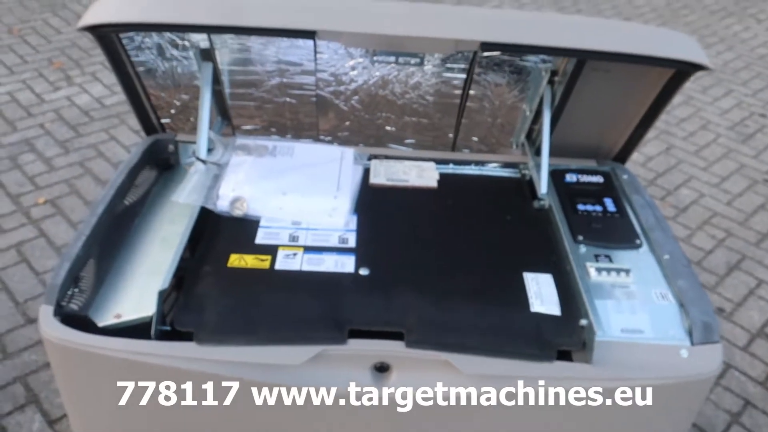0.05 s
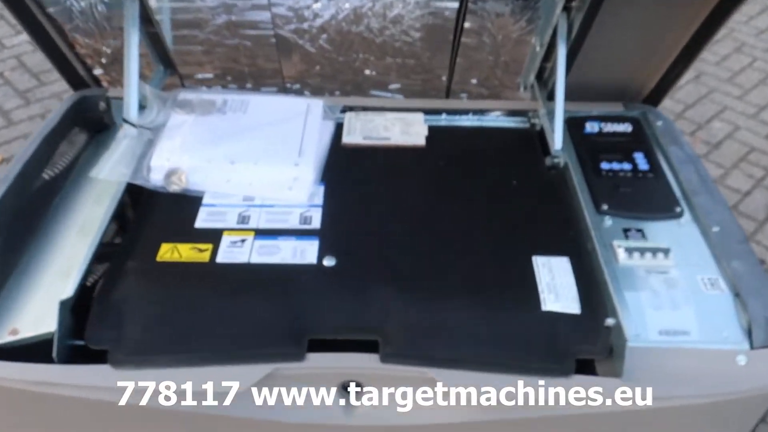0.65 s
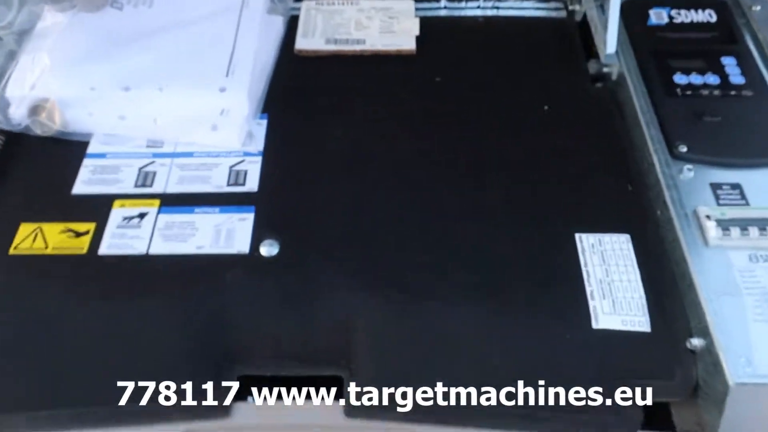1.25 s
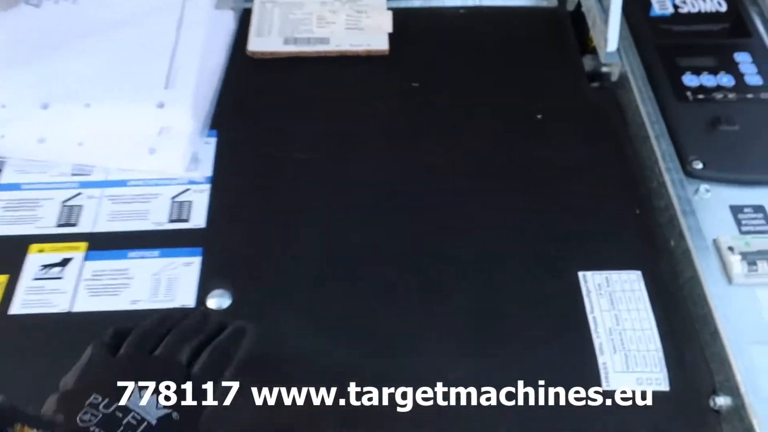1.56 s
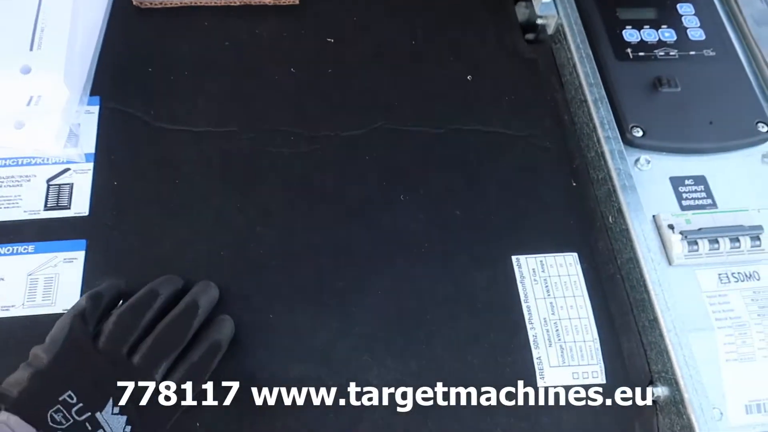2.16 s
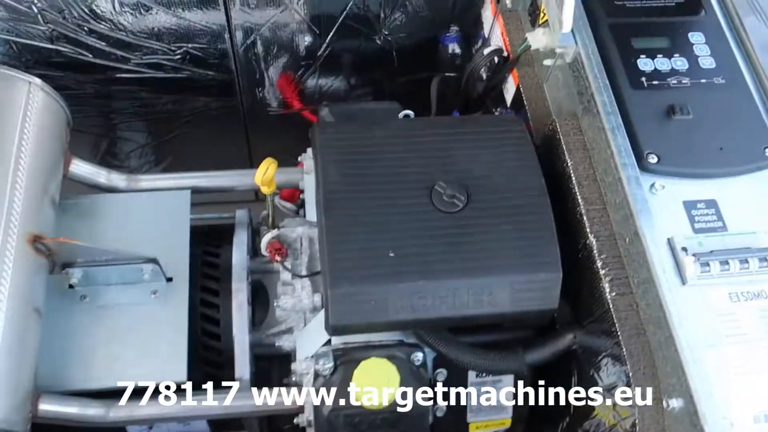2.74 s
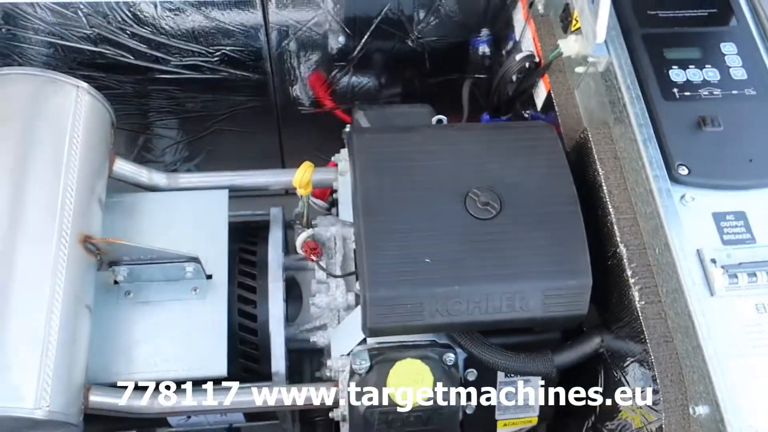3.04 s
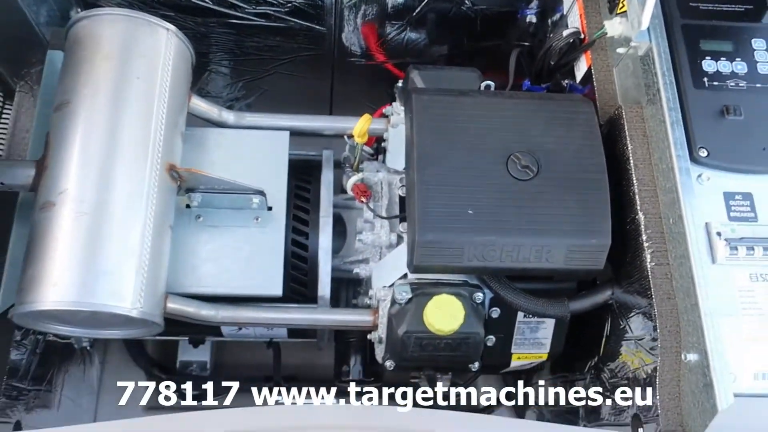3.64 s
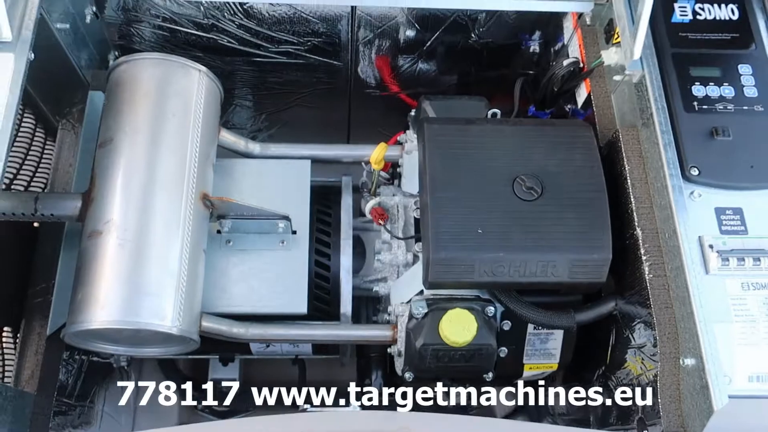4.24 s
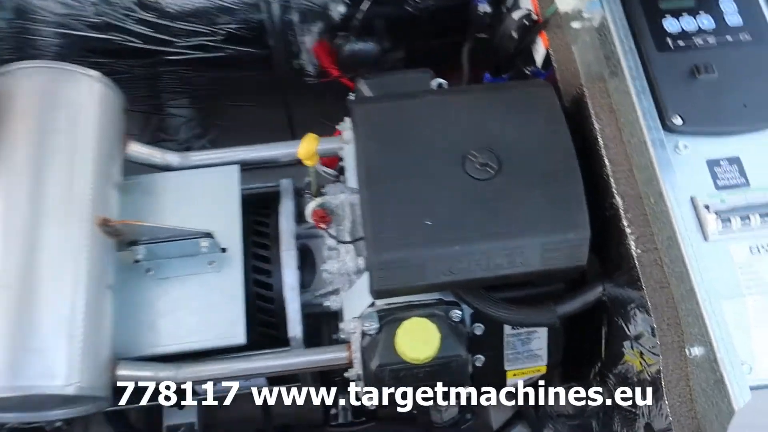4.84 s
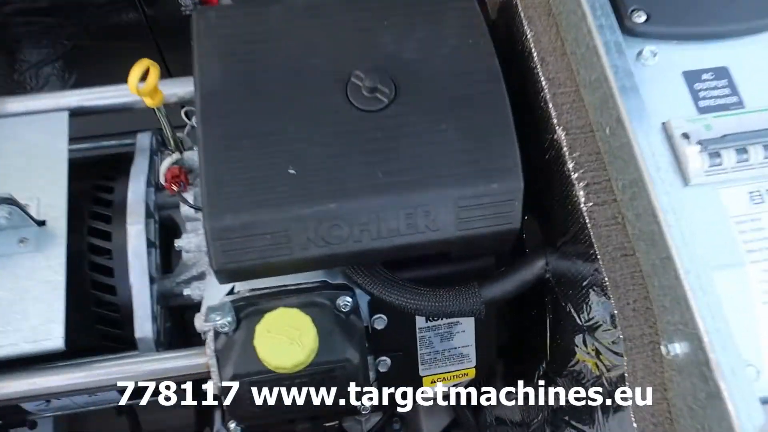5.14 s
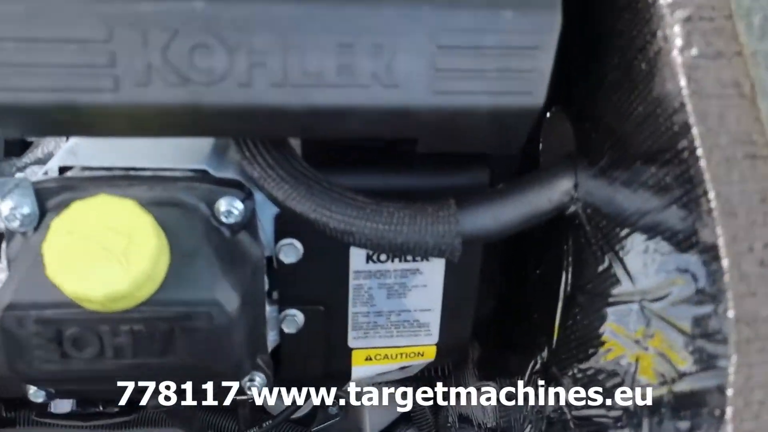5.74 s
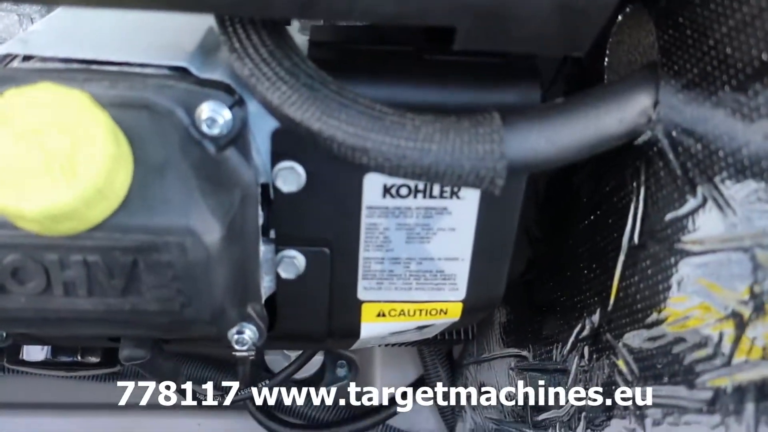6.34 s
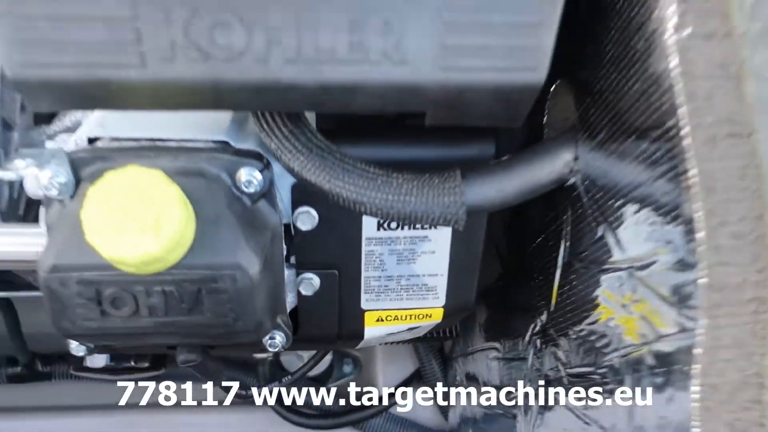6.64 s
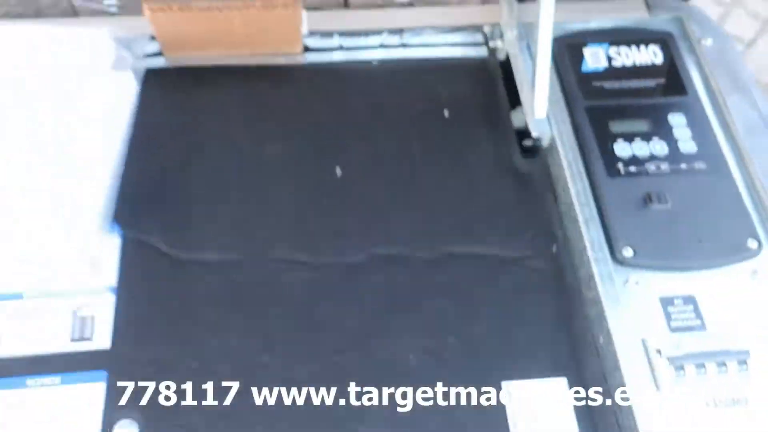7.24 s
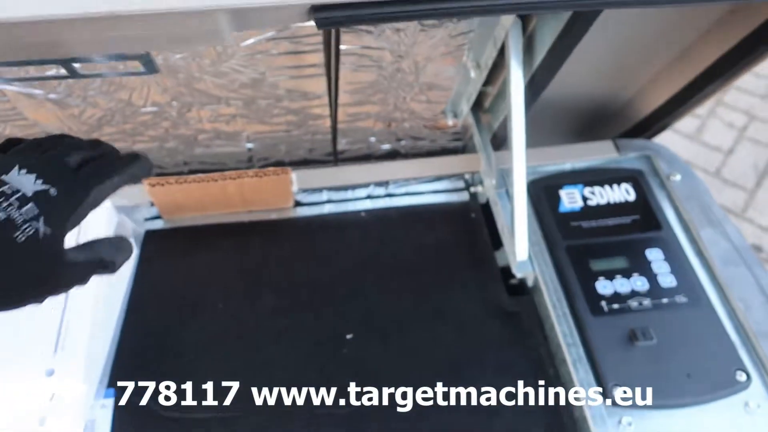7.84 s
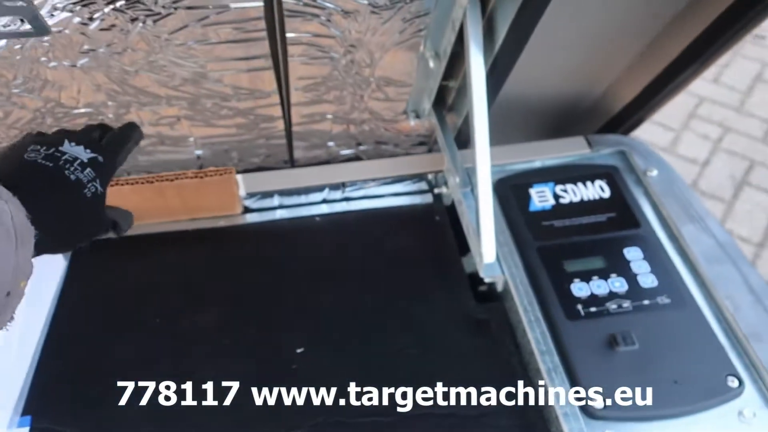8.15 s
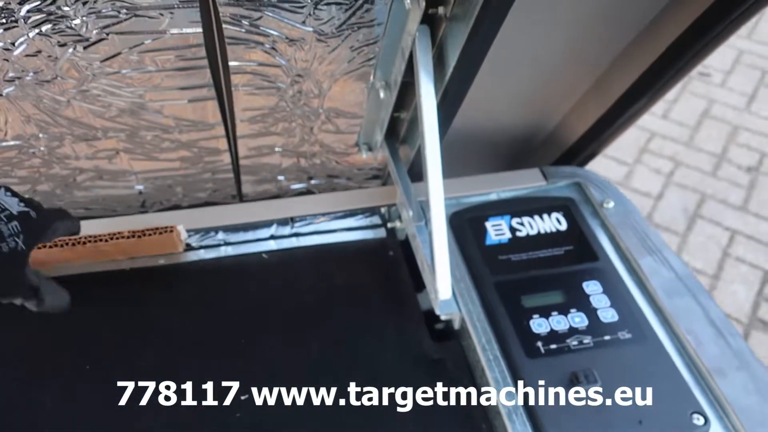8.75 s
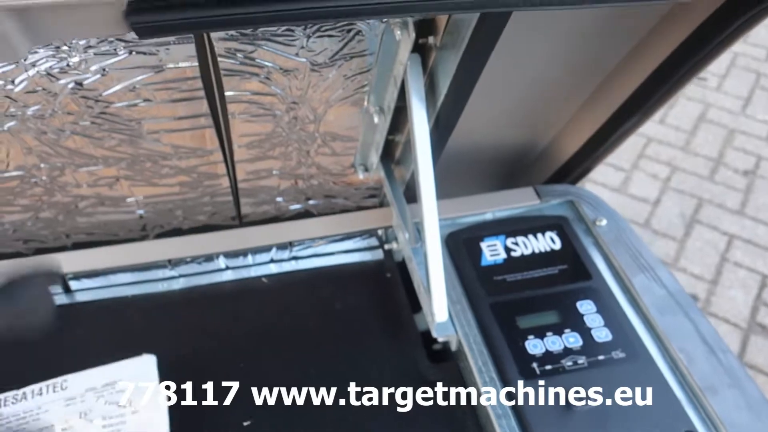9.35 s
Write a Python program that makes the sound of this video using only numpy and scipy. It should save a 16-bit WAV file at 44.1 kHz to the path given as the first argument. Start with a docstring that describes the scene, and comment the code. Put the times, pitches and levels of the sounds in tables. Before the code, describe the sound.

Traffic rumbles steadily around a paved yard while a distant diesel revs up and settles to idle. Close to the microphone, a gloved hand rubs and lifts a silent generator's inner cover with plastic clicks, knocks and a foam swish. The open bay rings faintly with the yard noise. Then the cover drops shut with a loud, rattling slam that overloads the microphone; everything dips and slowly recovers as papers are handled.

```python
"""Traffic rumbles round a paved yard while, some way off, a diesel's exhaust revs up and falls back to idle.
Close to the camera's stereo microphone a fine hiss swells and a gloved hand lifts the inner cover of a
switched-off generator: plastic clicks, the panel knocks, foam swishes, and the open bay rings with the
yard noise. The cover drops shut; the slam overloads the camera, whose gain control ducks everything and
slowly recovers while papers are handled on top."""
import sys
import numpy as np
from scipy import signal
from scipy.fft import rfft, irfft, next_fast_len
from scipy.io import wavfile
from scipy.ndimage import map_coordinates

SR = 44100
rng = np.random.default_rng(int(sys.argv[2]) if len(sys.argv) > 2 else 0)


def digitize_waveform(pressure):
    """Quantize a signal to 16-bit integers and store it at the path in sys.argv[1].

    Rows of a 2-D input are taken as channels; values are limited to [-1, 1].
    """
    field = np.atleast_2d(pressure).T
    bounded = np.clip(field, -1, 1)
    quanta = np.round(bounded * 32767).astype(np.int16)
    wavfile.write(sys.argv[1], SR, quanta)


N = 414099
TIME = np.arange(N) / SR

# traffic at the microphone: (time [s], rumble [dB], roar [dB], hiss [dB])
TRAFFIC_LEVELS = [(0.1, -34.5, -39, -46.5), (1.1, -32, -38, -42.5), (1.7, -32, -37, -45),
                  (3.3, -29, -38, -44.5), (3.9, -31.5, -37, -43), (4.7, -31, -39, -45.5),
                  (5.2, -33.5, -35.5, -42.5), (6.05, -32, -37.5, -46.5), (6.6, -34.5, -42, -49.5),
                  (9.3, -32, -39.5, -44.5)]
# its spectrum in the yard: (frequency [Hz], gain [dB])
TRAFFIC_COLOUR = [(18, -19), (30, -14), (58, -3), (90, -.5), (140, -5), (220, -4.5), (300, -6), (400, -11),
                  (700, -10.5), (1050, -15.5), (1250, -23), (2200, -31), (3400, -41.5), (4600, -48),
                  (8000, -60.5), (15000, -90)]
# width of diffuse sound at the two microphone ports: (frequency [Hz], side minus mid [dB])
STEREO_WIDTH = [(50, -68), (125, -34), (380, -14), (700, -17), (1300, -1), (2400, 1), (8000, 6.5)]
# the microphone turns in the noise: (time [s], left minus right [dB])
MIC_TURN = [(0.0, 3), (2.4, 3.5), (4.7, -2.5), (6.4, -3.5), (7.0, 0)]
# echo off the panel nearest the moving microphone: (time [s], lag [ms])
PANEL_ECHO = [(1.6, 0.62), (3.4, 0.19), (4.5, 0.44), (5.4, .59), (7.0, 0.51)]
# hollows under the lid and round the engine: (width [Hz], [(time [s], pitch [Hz], level [dB])])
HOLLOWS = [(45, [(3.1, 452, -49), (3.5, 443, -42), (4.0, 428, -40.5), (4.5, 428, -47), (5.2, 497, -44),
           (5.9, 481, -60)]), (20.4, [(3.2, 754, -64), (3.6, 745, -45.5), (4.0, 795, -49.5),
           (4.7, 760, -57), (5.3, 752, -51), (5.85, 748.7, -36.5), (6.2, 733, -55), (6.5, 760, -72)]),
           (85.5, [(3.1, 998, -70), (3.45, 980, -41), (3.7, 924, -41.5), (3.95, 1055, -39),
           (4.6, 1043, -48.5), (5.2, 1133, -46.5), (5.85, 1023, -38), (6.2, 1040, -49), (6.7, 1000, -76)]),
           (350, [(3.3, 2000, -66), (3.6, 1990, -52.5), (4.6, 2000, -49.5), (5.0, 1720, -55),
           (5.35, 1620, -41.5), (5.7, 1593, -54), (6.5, 1580, -54), (7.0, 1650, -77)]),
           (900, [(0, 3670, -60.5), (1.1, 3700, -53), (1.6, 3700, -64), (2.2, 3700, -82)]),
           (550, [(3.6, 2600, -75), (4.0, 2650, -57), (4.55, 2540, -48), (4.85, 2850, -52.5),
           (5.15, 3648, -53), (5.6, 3830, -67), (6.3, 3778, -80)])]
# distant diesel, revving and falling back: (time [s], firing rate [Hz])
DIESEL_FIRING = [(.55, 55.05), (1.1, 60.9), (1.45, 63.26), (2.38, 71.86), (2.65, 62.1), (2.95, 45.76),
                 (3.25, 40.05), (3.6, 46.4), (4.1, 48.76), (9.39, 52.4)]
# its exhaust note: (order [multiple of the firing rate], gain [dB])
EXHAUST_ORDERS = [(1, -3), (2, -6), (4, -10.5), (6, -20.5)]
# soft swells of fine hiss close to the microphone: (start [s], length [s], level [dB], swell [dB])
HISS_SWELLS = [(.75, 0.78, -63.5, 0), (5.0, 0.74, -67, -17), (6.85, 0.34, -62, 3), (7.17, 0.094, -41.5, 11),
               (8.64, 0.29, -61, 13), (8.968, 0.038, -36.5, 0)]
# spectrum of that hiss: (frequency [Hz], gain [dB])
HISS_COLOUR = [(800, -19), (2500, 8.5), (5000, 4.5), (9000, 5.5), (13000, -1), (15500, -3.5)]
# plastic and loose parts, close by: (time [s], peak level [dB], favoured frequency [Hz])
CLICKS = [(0.4303, -20, 4300), (1.56, -35, 4500), (1.796, -31, 4100), (1.802, -26.5, 8900),
          (1.917, -38, 4130), (2.0, -32, 2600), (2.3045, -17.5, 3000), (2.435, -27, 2370),
          (2.549, -22.5, 2190), (2.6291, -20.5, 2600), (5.029, -28.5, 11000), (5.691, -30.5, 8980),
          (6.9934, -30, 2787), (7.074, -23.5, 9020), (7.172, -25, 6940), (7.389, -13, 6100),
          (7.41, -20, 6000), (7.42, -17, 5000), (7.435, -18, 6000), (7.485, -32, 4970), (8.712, -42, 2490),
          (8.768, -33, 4070), (8.8935, -33, 4000), (9.006, -23, 2534), (9.0927, -24.5, 3520),
          (9.1368, -12, 3560)]
# modes of those parts: (frequency [Hz], width [Hz], gain [dB])
PLASTIC_MODES = [(950, 210, 0), (2500, 550, 0.5), (3120, 410, 5.5), (3360, 800, -0.5), (3970, 530, -1),
                 (6500, 640, -8.5), (8800, 1700, -14.5), (11900, 3400, -15.5)]
# knocks on the cover, with the slam near 7.35 s:
# (time [s], gain [dB], contact cut-off [Hz], favoured frequency [Hz], relative crack level [dB])
KNOCKS = [(1.794, -24.5, 700, 300, -3), (2.287, -15, 399.5, 148, -12), (2.302, -16, 680, 159, -5),
          (2.309, -16, 720, 635, -25), (2.333, -18, 190, 134, -28), (2.546, -22, 749.4, 770, -5),
          (2.554, -12, 600, 99.4, -11), (2.576, -15, 220, 117, -28), (2.629, -17, 407, 108, -21),
          (3.223, -17.5, 300, 138, -30), (5.027, -22, 1600, 494, -7), (7.171, -34.5, 450.7, 159.6, 5),
          (7.2392, -16, 560, 148, -10), (7.254, -17, 1000, 79, -8), (7.3453, 6.5, 693, 284, -9.5),
          (7.3497, 9, 780, 75.3, -9), (7.358, 3, 600, 122, -13), (7.389, 1.5, 900, 90, -14),
          (7.409, 1.5, 995, 111, -14.5), (7.520, 0, 950, 113, -15.5), (7.602, -29, 906, 110, -1.5),
          (7.7, -24, 248, 127, -10), (8.039, -27, 217, 110, -29), (8.9, -18.5, 260, 145, -40),
          (9.007, -13.5, 310, 205.7, -27), (9.137, -27.5, 1100, 400, -20), (9.287, -9, 300, 111, -25.5),
          (9.326, -16, 300, 173, -38), (9.379, -9, 227, 144.6, -16), (9.381, -17, 1500, 900, -20)]
# modes of the cover on its housing: (frequency [Hz], gain [dB], t60 [s])
COVER_MODES = [(68.5, -15, 0.29), (85.4, -3.5, 0.21), (121.2, -11.5, 0.16), (157, -4.5, 0.11),
               (197.5, -9, 0.14), (248, -11, 0.21), (300, -6, 0.07), (406, -9, 0.074), (560, -11.5, 0.063),
               (676, -7.5, 0.046), (749, -9.5, 0.048), (815, -12.5, 0.053), (980, -9, 0.023),
               (1350, -17, 0.058), (1863, -25, .083), (2390, -20, 0.087)]
# crack of a hard contact: (frequency [Hz], gain [dB])
CRACK_COLOUR = [(200, 6), (900, 2), (2500, -9.5), (5000, -22), (9000, -28.5), (15000, -31)]
# glove and papers sliding: (start [s], length [s], level [dB], swell [dB])
RUB_STROKES = [(1.797, 0.032, -39, -3), (1.9, 0.026, -44.5, 3), (1.995, 0.04, -44.5, 0),
               (2.105, 0.077, -36.5, 2), (2.22, 0.037, -47, -1), (2.29, 0.092, -42, -4),
               (2.53, 0.06, -40.5, -10), (7.235, 0.026, -29.5, 6), (8.44, 0.094, -44.5, -1),
               (8.668, 0.01, -37.5, 2), (8.715, 0.063, -45, 7), (8.93, 0.071, -33.5, 13),
               (9.05, 0.089, -43.5, -5.5), (9.255, 0.048, -45, -3)]
# their friction noise: (frequency [Hz], gain [dB])
RUB_COLOUR = [(150, 18), (600, 11), (1200, -3), (1900, -1.5), (2600, 3), (4000, -1), (6000, -4.5),
              (9000, -5), (12000, -8.5), (15000, -11)]
# panel modes under a dragging hand: (frequency [Hz], width [Hz], gain [dB])
RUB_MODES = [(512, 29, 4), (790, 94, -5), (980, 130, -3.5), (1475, 83, -9.5)]
# the cover's foam edge on the housing: (start [s], length [s], level [dB], swell [dB])
FOAM_STROKES = [(1.85, 0.33, -52.5, 2), (2.33, 0.16, -43, 3), (2.535, 0.11, -39.5, 6),
                (2.68, 0.3, -43.5, -3.5), (3.06, .17, -37.5, -3), (7.175, 0.25, -43, -8),
                (7.36, 0.054, -33.5, -20)]
# its friction noise: (frequency [Hz], gain [dB])
FOAM_COLOUR = [(200, 3), (850, 9.5), (1600, -10), (2100, 3.5), (2600, 0), (6000, -4.5), (9000, -6),
               (11000, -16.5), (15000, -32.5)]
# the glove judders over the cover: (start [s], gap between slips [s])
JUDDER_TIMING = (2.107, .0115)
# each slip: (contact cut-off [Hz], favoured frequency [Hz], relative crack level [dB])
JUDDER_TOUCH = (1100, 145.7, -7)
# ring of the open engine bay: (time [s], level [dB])
BAY_LEVEL = [(2.6, -83), (3.4, -41.5), (5.0, -39), (5.8, -36.5), (6.3, -39.5), (6.9, -66), (7.3, -58)]
# its air modes: (frequency [Hz], width [Hz], gain [dB])
BAY_MODES = [(305, 34, -1), (560, 36, -8.5), (828, 150, -7.5)]
# echo off its floor: (time [s], lag [ms], strength [0-1])
BAY_ECHO = [(2.6, 2.4, 0), (3.5, 4.4, 0.07), (4.0, 3.85, 0.03), (4.7, 3.74, 0.17), (5.2, 4.2, 0.13),
            (5.85, 3.6, 0.53), (6.9, 3.87, 0)]
# dry edges, the closing cover's and later cardboard: (start [s], length [s], level [dB], swell [dB])
RASP_STROKES = [(6.995, 0.01, -48, -10), (7.02, 0.045, -55, 0), (7.092, 0.016, -45, -2),
                (7.122, .033, -45, 0), (7.24, 0.16, -41.5, 4), (8.977, 0.025, -36, 0)]
# their resonances: (frequency [Hz], width [Hz], gain [dB])
RASP_MODES = [(2500, 340, 11.5), (2810, 160, 12.5), (2987, 310, -7)]


def from_db(db):
    """Decibels to gain."""
    return 10 ** (np.asarray(db) / 20)


def rms_one(x):
    """Scale to unit power."""
    return x / np.sqrt(np.mean(x ** 2) + 1e-20)


def in_time(rows):
    """Each column of a curve table at every sample."""
    times, *columns = np.transpose(rows)
    return [np.interp(TIME, times, column) for column in columns]


def butter(x, hz, kind, order=2):
    """Causal Butterworth filter."""
    return signal.sosfilt(signal.butter(order, hz, kind, fs=SR, output="sos"), x)


def lagging(x, seconds):
    """Follow a value with a time constant."""
    pole = np.exp(-1 / (seconds * SR))
    return signal.lfilter([1 - pole], [1, -pole], x)


def colour(x, points):
    """Shape a steady noise by a table of (frequency [Hz], gain [dB])."""
    size = next_fast_len(x.shape[-1])
    hz, db = np.transpose(points)
    bin_hz = np.arange(size // 2 + 1) * SR / size
    gain = from_db(np.interp(np.log(bin_hz + 1), np.log(hz), db))
    return irfft(rfft(x, size) * gain, size)[..., :x.shape[-1]]


def drift(knots_per_s):
    """Random wander of unit power."""
    knots = rng.standard_normal(4000)
    return rms_one(np.interp(TIME * knots_per_s, np.arange(len(knots)), knots))


def resonate(x, modes):
    """Parallel resonances of (frequency [Hz], width [Hz], gain [dB]), signs alternating."""
    out = 0
    for k, (hz, width, db) in enumerate(modes):
        r = np.exp(-np.pi * width / SR)
        ring = signal.lfilter([1, 0, -1], [1, -2 * r * np.cos(2 * np.pi * hz / SR), r * r], x)
        out = out + (-1) ** k * from_db(db) * (1 - r * r) / 2 * ring
    return out


def nearness(hz, centre_hz, octaves):
    """A bell over pitch, 1 at its centre."""
    return np.exp(-(np.log2(hz / centre_hz) / octaves) ** 2)


def add(out, start_s, sound):
    """Mix a sound in at a time."""
    at = round(start_s * SR)
    out[..., at:at + sound.shape[-1]] += sound[..., :max(N - at, 0)]


def delayed(x, lag_ms):
    """Both channels, late by a changing lag."""
    return np.array([np.interp(TIME - lag_ms / 1000, TIME, port) for port in x])


def from_left(x, lag_samples):
    """A near source on the left reaches the microphone's right port later."""
    return np.array([x, map_coordinates(x, [np.arange(N) - lag_samples], order=3)])


def diffuse():
    """Noise from all around: alike at both ports in the bass, wide in the treble."""
    mid, side = rng.standard_normal((2, N))
    side = colour(side, STEREO_WIDTH)
    return np.array([mid + side, mid - side])


def strokes(rows, rise_s, fall_s, edge_share):
    """Gain of strokes of noise: each fades in, swells or ebbs, and fades out; long ones more softly."""
    power = 0
    for start, length, level_db, swell_db in rows:
        t, soft_s = TIME - start, edge_share * length
        before = np.maximum(-t, 0) / (rise_s + soft_s)
        after = np.maximum(t - length, 0) / (fall_s + soft_s)
        fade_db = 20 * np.minimum(before + after, 10)
        progress = np.clip(t / length, 0, 1)
        power = power + from_db(level_db + swell_db * (progress - .5) - fade_db) ** 2
    return np.sqrt(power)


def friction(spectrum, snags_per_s, snag_size):
    """Sliding noise: the direct sound with its snags, a scattered stereo pair, and the bare snags."""
    snags = (rng.random(N) < snags_per_s / SR) * rng.standard_normal(N) * snag_size
    noise = rng.standard_normal((3, N))
    noise[0] += snags
    noise = rms_one(colour(noise, spectrum))
    return noise[0], noise[1:], snags


def gritty(x, patchy_db, patches_per_s):
    """The contact keeps shifting, so each band of a friction noise flares and fades on its own."""
    edges_hz = np.geomspace(500, 12000, 13)
    size = next_fast_len(N)
    spectrum = rfft(x, size)
    band_of_bin = np.searchsorted(edges_hz, np.arange(size // 2 + 1) * SR / size)
    bands = (irfft(spectrum * (band_of_bin == k), size)[:N] for k in range(len(edges_hz) + 1))
    return rms_one(sum(band * from_db(patchy_db * drift(patches_per_s)) for band in bands))


def traffic(low_hz=400, high_hz=1400):
    """Traffic all round the yard; rumble, roar and hiss waver and are shaded as the microphone moves."""
    rumble_db, roar_db, hiss_db = in_time(TRAFFIC_LEVELS)
    rumble, roar, hiss = (colour(diffuse(), TRAFFIC_COLOUR) for _ in range(3))
    rumble = butter(rumble, low_hz, "low", order=4)
    roar = butter(roar, [low_hz, high_hz], "band", order=4)
    hiss = panel_echo(butter(hiss, high_hz, "high", order=4))
    rumble = rms_one(rumble) * from_db(rumble_db + 0.94 * drift(15))
    roar = rms_one(roar) * from_db(roar_db + 0.5 * drift(11))
    hiss = rms_one(hiss) * from_db(hiss_db + 1.06 * drift(12))
    # the port that faces the noise gets more of its short waves
    balance = from_db(in_time(MIC_TURN)[0] * [[.5], [-.5]])
    return rumble + (bay_echo(roar + hiss) + bay_ring() + hollows()) * balance


def panel_echo(x, strength=0.12):
    """One short, shifting echo off a panel beside the microphone makes the hiss hollow."""
    lag_ms, = in_time(PANEL_ECHO)
    return x + strength * delayed(x, lag_ms)


def hollows():
    """Yard noise rings in the housing's hollows; pitch and strength shift as the microphone passes."""
    out, noise = 0, diffuse()
    for width_hz, curve in HOLLOWS:
        hz, db = in_time(curve)
        carrier = np.exp(2j * np.pi * np.cumsum(hz) / SR)
        band = (butter(noise / carrier, width_hz / 2, "low") * carrier).real   # centred on the pitch
        out = out + rms_one(band) * from_db(db)
    return out


def diesel(idle_hz=58.7, base_db=-35, rev_db_per_octave=40.5, arrives_s=2.7, approach_db_per_s=2):
    """Only low exhaust orders carry this far, each wavering on its own; revving lifts the lowest most."""
    firing_hz, = in_time(DIESEL_FIRING)
    rev_db = rev_db_per_octave * np.maximum(np.log2(firing_hz / idle_hz), 0)
    unsteady_hz = firing_hz * (1 + 0.0081 * drift(12))
    phase = 2 * np.pi * np.cumsum(unsteady_hz) / SR
    note = sum(np.sin(order * phase) * from_db(db + rev_db / order + 2.0 * drift(8.2))
               for order, db in EXHAUST_ORDERS)
    distance_loss_db = approach_db_per_s * np.maximum(arrives_s - TIME, 0)
    return np.sqrt(2) * note * from_db(base_db - distance_loss_db)


def fine_hiss(grain_db=3.5, floor_db=-65.0):
    """Soft swells of fine, high hiss close to the microphone, over its own faint, steady hiss."""
    hiss = rms_one(colour(rng.standard_normal(N), HISS_COLOUR))
    gain = from_db(floor_db) + strokes(HISS_SWELLS, rise_s=0.036, fall_s=0.021, edge_share=0.074)
    return from_left(hiss * gain * from_db(grain_db * drift(150)), lag_samples=2.37)


def plastic_clicks(t60=0.018, grit_db=-17, favour_db=6, favour_octaves=0.38):
    """A brief gritty snap rings a small plastic part near the microphone."""
    out, t = np.zeros(N), TIME[:SR // 20]
    for start_s, peak_db, spot_hz in CLICKS:
        modes = [(hz, width, db + favour_db * nearness(hz, spot_hz, favour_octaves))
                 for hz, width, db in PLASTIC_MODES]
        grit = rng.standard_normal(len(t)) * from_db(grit_db - 60 * t / t60)
        snap = resonate((t == 0) + grit, modes)
        add(out, start_s, from_db(peak_db) * snap / np.abs(snap).max())
    return from_left(out, lag_samples=1.9)


def cover_knocks(crack_t60=0.054, crack_rise_s=0.00043, rattle_t60=0.6, rattle_db=-25,
                 spread_db=2.84, side_db=-8, favour_db=13.0, favour_octaves=0.18, radiate_hz=55):
    """Each knock rings the panel; soft contacts miss the high modes, hard ones crack and rattle."""
    out, t = np.zeros((2, N)), TIME[:SR // 2]
    hz, mode_db, t60 = np.transpose(COVER_MODES)
    rings = np.sin(2 * np.pi * hz[:, None] * t) * from_db(-60 * t / t60[:, None])
    crack_decay = from_db(-60 * t / crack_t60) + from_db(rattle_db - 60 * t / rattle_t60)
    crack_shape = crack_decay * (1 - np.exp(-t / crack_rise_s))
    # neighbouring groups of modes swing in opposite directions
    signs = (-1) ** ((np.arange(len(hz)) + 1) // 2)
    for start_s, gain_db, contact_hz, spot_hz, crack_db in KNOCKS + glove_judder():
        favoured_db = favour_db * nearness(hz, spot_hz, favour_octaves)
        chance_db = spread_db * rng.standard_normal(len(hz)) * (hz > spot_hz)
        strength = signs * from_db(mode_db + favoured_db + chance_db)
        body = butter(strength @ rings, contact_hz, "low")
        body = butter(body, radiate_hz, "high")
        mid, side = rms_one(colour(rng.standard_normal((2, len(t))), CRACK_COLOUR))
        crack = (mid + from_db(side_db) * side * [[1], [-1]]) * crack_shape
        add(out, start_s, from_db(gain_db) * (body + from_db(crack_db) * crack))
    return out


def rubbing(grain_db=-2.5, stutter_db=4.0, scatter=0.13, panel_db=-3):
    """Glove and paper fibres catch and slip; snags ring the panel, and the housing scatters some noise."""
    direct, scattered, snags = friction(RUB_COLOUR, snags_per_s=250, snag_size=6.1)
    direct = gritty(direct, patchy_db=0.5, patches_per_s=130)
    panel = from_db(panel_db) * rms_one(resonate(snags, RUB_MODES))
    motion = strokes(RUB_STROKES, rise_s=0.027, fall_s=0.018, edge_share=0.21)
    grip = from_db(grain_db * drift(400) + stutter_db * drift(60))
    return motion * grip * (from_left(direct + panel, lag_samples=1.4) + scatter * scattered)


def foam_swish(scatter=0.099):
    """The cover's foam edge slides along the housing and catches on specks of grit."""
    direct, scattered, _ = friction(FOAM_COLOUR, snags_per_s=300, snag_size=5.0)
    direct = gritty(direct, patchy_db=2.4, patches_per_s=49)
    motion = strokes(FOAM_STROKES, rise_s=0.028, fall_s=0.013, edge_share=0.21)
    return motion * (from_left(direct, lag_samples=1.81) + scatter * scattered)


def glove_judder(slips=8, first_db=-25.5, step_db=0.1, uneven=0.143):
    """The dragging glove taps the cover in a quick, uneven run of slips, given as rows like KNOCKS."""
    start_s, gap_s = JUDDER_TIMING
    slack = uneven * rng.standard_normal(slips)
    return [(start_s + (k + slack[k]) * gap_s, first_db + k * step_db, *JUDDER_TOUCH)
            for k in range(slips)]


def bay_ring(cutoff_hz=1470):
    """Yard noise rings the air in the open engine bay."""
    ring = resonate(butter(diffuse(), cutoff_hz, "low"), BAY_MODES)
    return rms_one(ring) * from_db(in_time(BAY_LEVEL)[0])


def bay_echo(x):
    """The echo off the bay's floor cuts valleys into the noise; they slide as the microphone moves."""
    lag_ms, strength = in_time(BAY_ECHO)
    return (x + strength * delayed(x, lag_ms)) / np.sqrt(1 + strength ** 2)


def edge_rasp(stutter_db=4.0):
    """Dry friction on an edge of the cover or of cardboard excites a few narrow resonances."""
    pressure = strokes(RASP_STROKES, rise_s=0.0054, fall_s=0.018, edge_share=0.2)
    ring = rms_one(resonate(rng.standard_normal((2, N)), RASP_MODES))
    return ring * pressure * from_db(stutter_db * drift(200))


def scene():
    """Traffic and the diesel at a distance, the handling close to the microphone."""
    distant = traffic() + diesel()
    close = rubbing() + fine_hiss() + edge_rasp() + foam_swish() + cover_knocks() + plastic_clicks()
    return distant + close


def record(dry, threshold_db=-9.0, release_db_per_s=8.0, sense_s=0.0047, attack_s=0.0071, top_hz=15400):
    """The camera's gain dives on loud blows and creeps back; what gets past it clips; the top is cut."""
    power = lagging(np.mean(dry ** 2, axis=0), sense_s)
    over_db = np.maximum(10 * np.log10(power + 1e-18) - threshold_db, 0)
    release_db = release_db_per_s * TIME
    held_db = np.maximum.accumulate(over_db + release_db) - release_db
    ducked = dry * from_db(-lagging(held_db, attack_s))
    clipped = np.clip(ducked, -.985, .985)
    return signal.sosfilt(signal.ellip(10, .1, 80, top_hz, fs=SR, output="sos"), clipped)


dry = scene()
out = record(dry)
digitize_waveform(out)
```